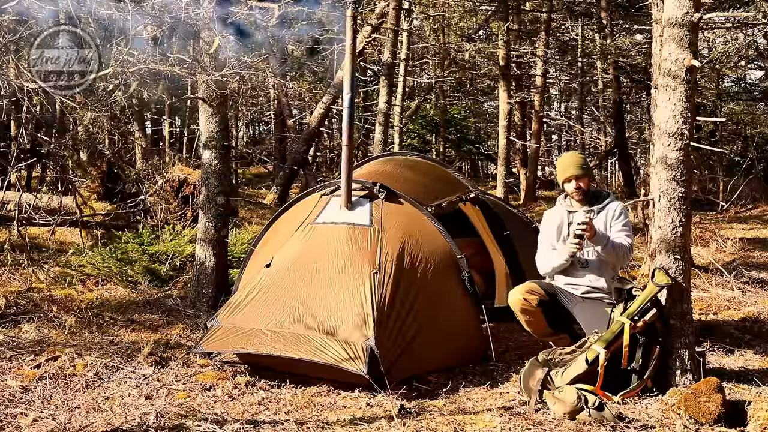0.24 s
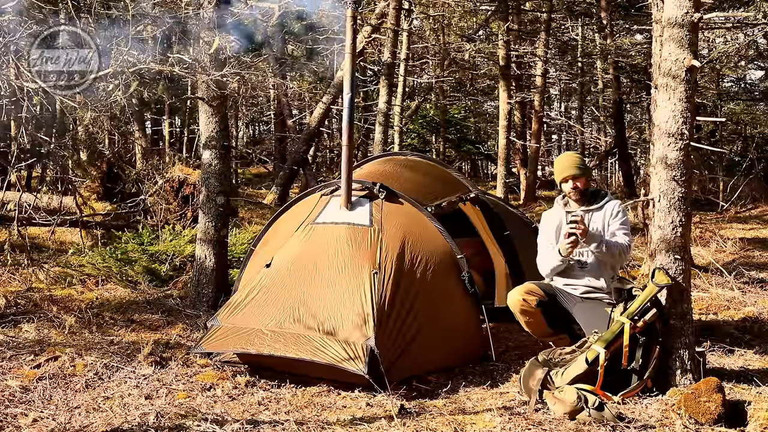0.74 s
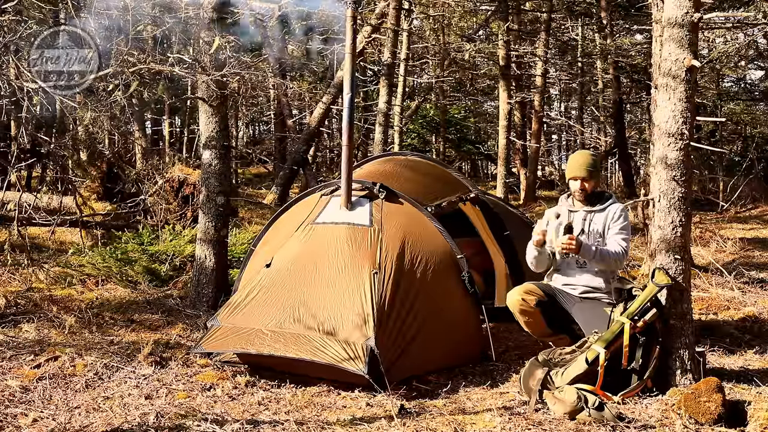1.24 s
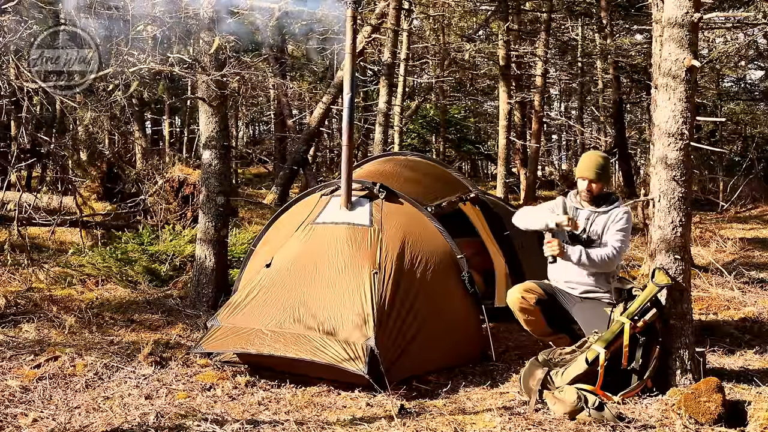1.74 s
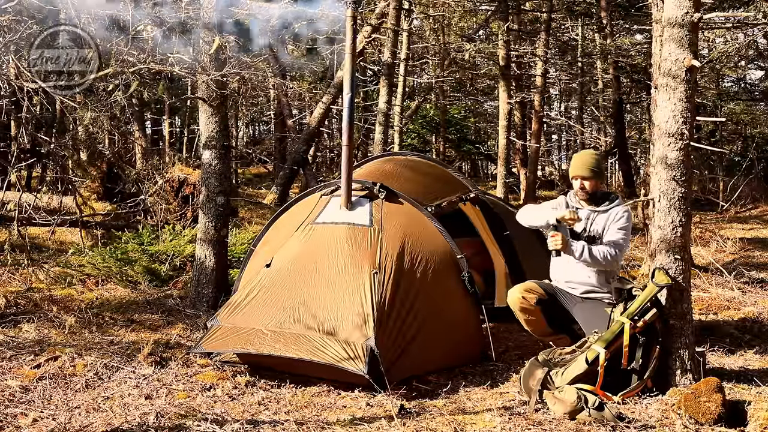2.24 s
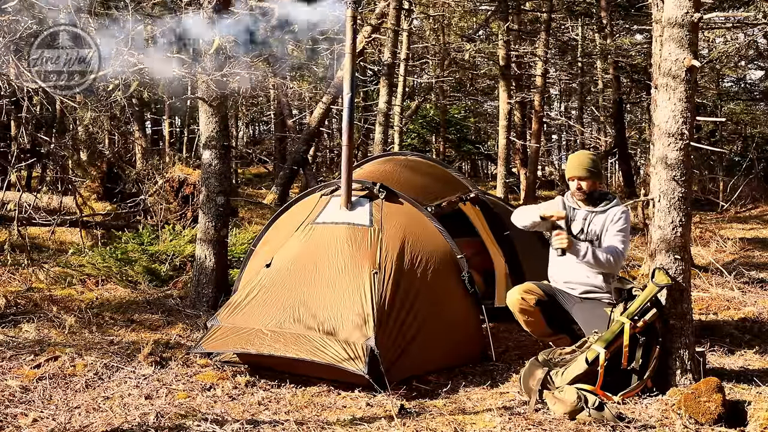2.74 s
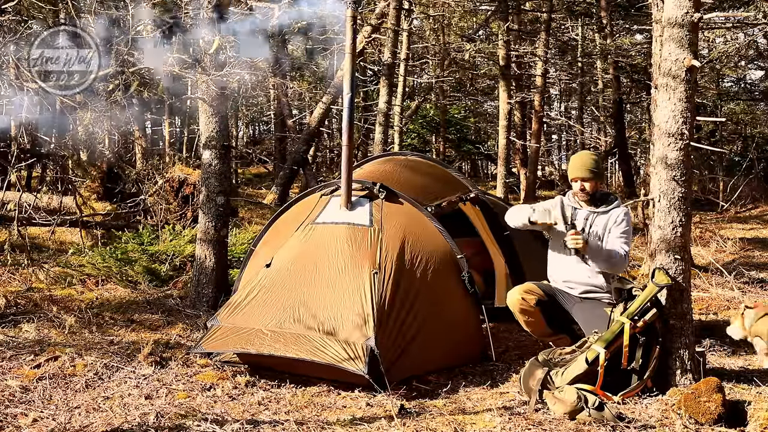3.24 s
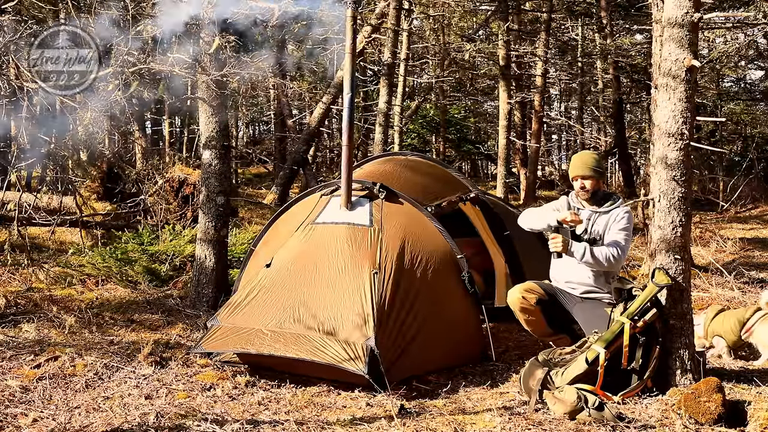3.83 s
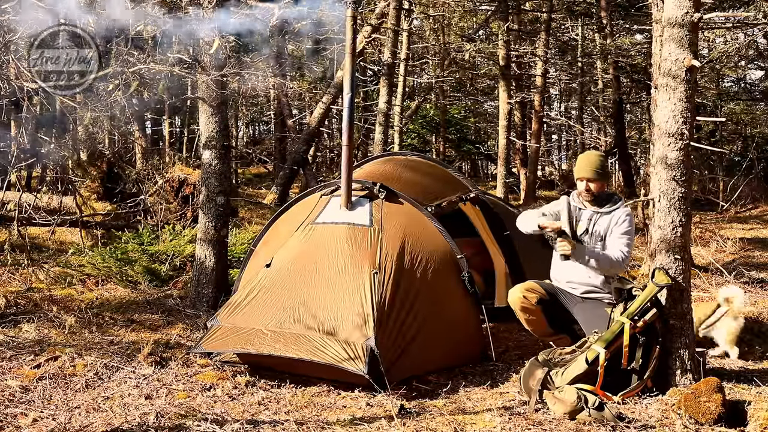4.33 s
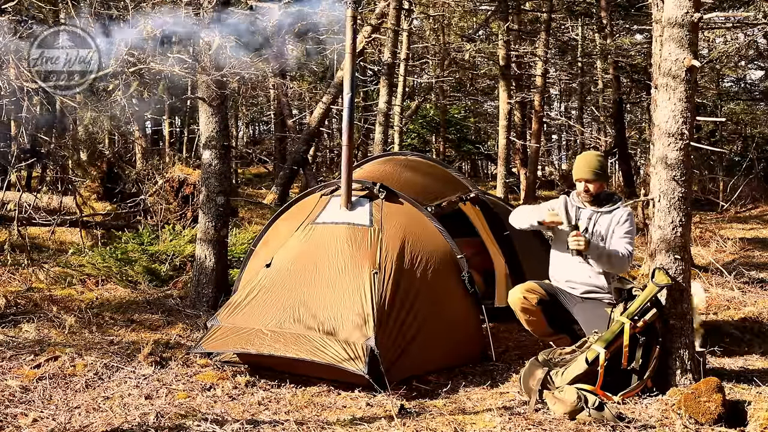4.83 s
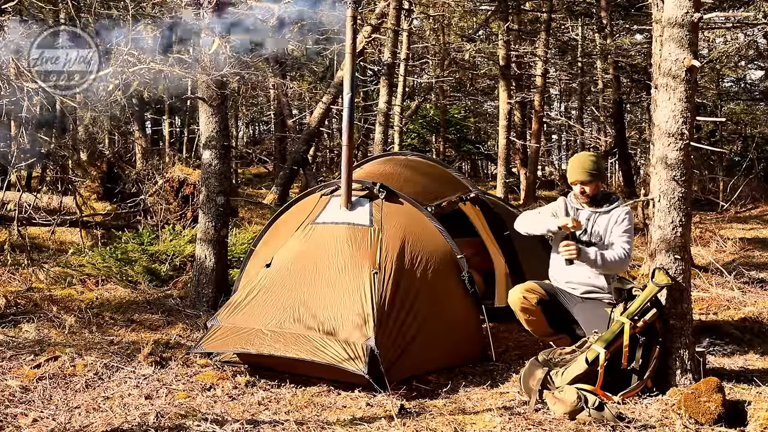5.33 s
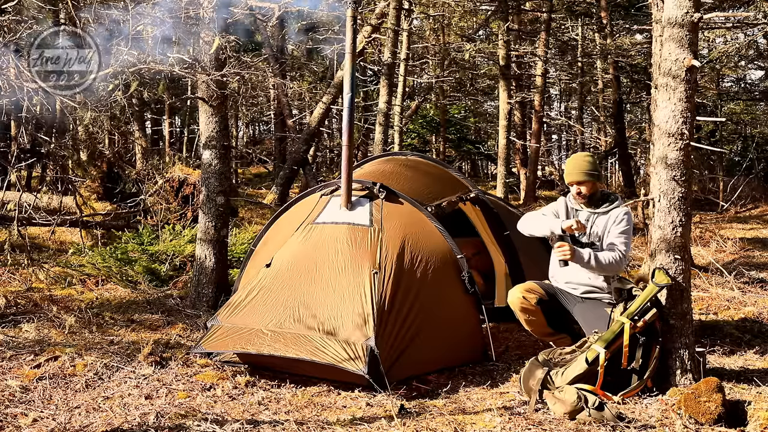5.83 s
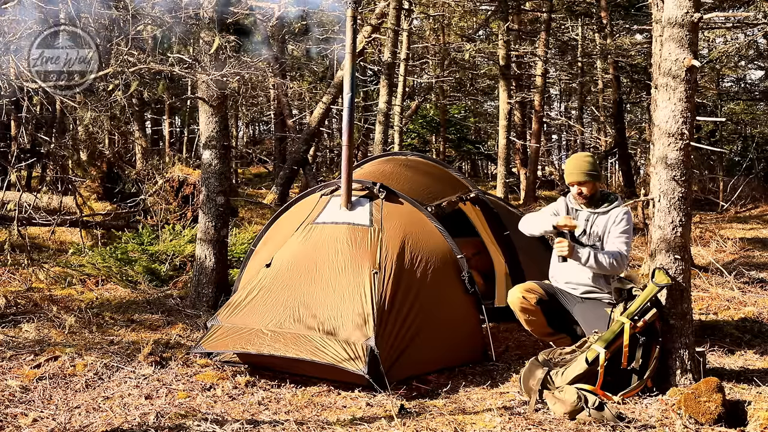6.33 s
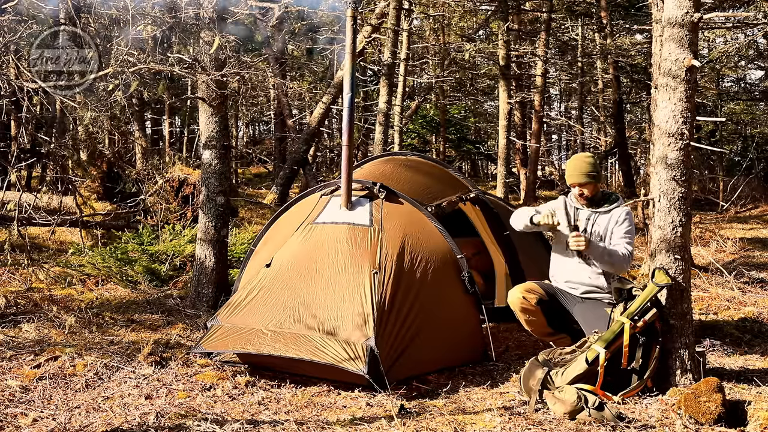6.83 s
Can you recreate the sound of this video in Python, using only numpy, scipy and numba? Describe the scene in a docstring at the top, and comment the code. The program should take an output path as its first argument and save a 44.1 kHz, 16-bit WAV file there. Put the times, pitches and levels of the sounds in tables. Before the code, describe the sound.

A quiet conifer forest, heard from a few metres away: steady soft hiss and roar of wind in needles, with low, wavering wind rumble on the microphone throughout. From 0.1 to 0.4 s fingers rustle a small coffee mill with tiny dry ticks. At 0.49 s the crank seats with a hard, bright snap and quick rebound, by far the loudest event. Lighter clicks follow at 0.59 and 0.73 s, fading to faint handling until 1.4 s. At 1.7 s grinding starts with a hesitant crunch, catching around 1.9 and 2.2 s, then settles into about two and a half turns per second, each with two swelling pushes. Beans crack and splinter with midrange, hollow rattling resonance and bright gritty specks. A clear jam at 5.7 s releases in sharp splits near 5.8 s; a hard tick lands at 6.0 s. Grinding continues to the end, about 7 s.

```python
"""Wind hisses and roars in conifers and rumbles on a microphone a few metres off: coloured noises with wandering levels.
Hands rustle and tick at a small coffee mill (clicks, ringing modes), then its crank snaps into place (blows on a lid).
Turning the crank crunches beans: random cracks and noisy splinters ring the body's modes and two sliding resonances,
under a load that swells at each push, stalls now and then and bites again. A short scattered tail surrounds the mill."""
import sys
import numpy as np
from scipy import signal
from scipy.fft import rfft, irfft, next_fast_len
from scipy.io import wavfile
from scipy.ndimage import uniform_filter1d
from numba import njit

SR = 44100
rng = np.random.default_rng(int(sys.argv[2]) if len(sys.argv) > 2 else 0)


def output_pcm(signal):
    """Save a mono or channel-first signal as 16-bit PCM at the path in sys.argv[1].

    Samples are clipped to [-1, 1] before scaling.
    """
    pcm = np.clip(np.atleast_2d(signal).T, -1, 1) * 32767
    wavfile.write(sys.argv[1], SR, np.round(pcm).astype(np.int16))


def convert_level_to_amplitude(level_db):
    """Map a level in decibels to its linear amplitude factor."""
    exponent = np.asarray(level_db, float) / 20
    return 10 ** exponent


N = 311346

# Turns of the crank, two pushes each. Each row: start in seconds, load at first push in relative dB,
# load at second push in relative dB, spectral tilt in dB per octave.
TURNS = [(1.55, -40.5, -42, 3.5), (2.0, -40.5, -42.5, 0), (2.3, -36.5, -40.5, 0.8),
         (2.685, -38.5, -40, -0.93), (3.083, -37.5, -40.5, -0.12), (3.496, -37, -41, 0),
         (3.863, -38, -42, -0.5), (4.258, -39.5, -39.5, 0.52), (4.664, -39, -38.5, -0.72),
         (5.033, -38, -39.5, -0.5), (5.423, -39, -38, 1), (5.889, -40.5, -37.5, -0.5),
         (6.253, -38, -36.5, -1), (6.673, -40.5, -38.5, -0.13), (7.03, -37, -39, -0.5),
         (7.42, -39, -39, 0.5)]


def on_time(table, column=1):
    """A column of a curve, whose first column is seconds, at every sample."""
    rows = np.array(table)
    return np.interp(np.arange(N) / SR, rows[:, 0], rows[:, column])


def unit(x):
    """Scale to rms 1."""
    return x / np.sqrt(np.mean(x ** 2))


def colour(x, points):
    """Shape a noise by a spectrum of (Hz, dB) points."""
    size = next_fast_len(len(x))
    hz, db = np.transpose(points)
    bin_hz = np.arange(size // 2 + 1) * SR / size
    gain = convert_level_to_amplitude(np.interp(np.log(bin_hz + 1), np.log(hz), db))
    return irfft(rfft(x, size) * gain, size)[:len(x)]


def walk(rate_hz):
    """Random levels 1 / rate_hz apart, joined by smoothed slopes; rms 1."""
    k = max(int(SR / rate_hz), 2)
    steps = np.interp(np.arange(N), np.arange(N // 64) * k, rng.standard_normal(N // 64))
    return unit(uniform_filter1d(steps, k))


@njit
def mode(x, hz, t60_s):
    """One decaying mode whose pitch may slide: a rotating complex state driven by x."""
    y, z = np.empty(len(x)), 0j
    for i in range(len(x)):
        z = z * np.exp(2j * np.pi * hz[i] / SR - np.log(1000) / (t60_s * SR)) + x[i]
        y[i] = z.imag
    return y


def ring(x, hz, t60_s):
    """A mode at a fixed or moving pitch, kept below 0.45 SR."""
    return mode(x + 1e-18, np.minimum(hz, 0.45 * SR) * np.ones(N), 1.0 * t60_s)


def blows(s, size):
    """An impulse train."""
    return np.bincount(np.clip((np.asarray(s) * SR).astype(int), 0, N - 1), size, N)


def crackle(rate_hz, spread_db, most_db):
    """Random clicks, many small and few large: times and signed sizes."""
    chance = rng.random((60000, 3))
    s = np.cumsum(-np.log(1 - chance[:, 0])) / rate_hz
    size_db = np.minimum(-spread_db * np.log(1 - chance[:, 1]), most_db)
    size = convert_level_to_amplitude(size_db) * np.sign(chance[:, 2] - 0.5)
    return s, size * (s < N / SR)


def peaks_db(s, db, rise_s, fall_s):
    """The highest of several peaks at every sample; rise_s and fall_s are per 10 dB."""
    t, out = np.arange(N) / SR, np.full(N, -200.0)
    for at, top, rise, fall in np.broadcast(s, db, rise_s, fall_s):
        out = np.maximum(out, top - 10 * np.maximum((at - t) / rise, (t - at) / fall))
    return out


def rumble():
    """Slow wind eddies press on the membrane: low noise whose level wanders."""
    # Each row: time in seconds, level in dB.
    rumble_level = [(0, -40.5), (1.2, -40), (1.9, -41.5), (2.7, -40.5), (3.1, -38), (3.6, -41.5),
                    (4.5, -40), (5.1, -41), (5.6, -43), (6.1, -39.5), (7.06, -39)]
    # Each row: frequency in Hz, relative density in dB per Hz.
    rumble_colour = [(15, -13.5), (22, 1), (33, 2), (60, -3), (90, -7.5), (130, -23.5), (250, -50.5)]
    level_db = on_time(rumble_level) + 0.5 * walk(11)
    return unit(colour(rng.standard_normal(N), rumble_colour)) * convert_level_to_amplitude(level_db)


def needles():
    """A distant smooth hiss that breathes with the gusts, over the deeper roar of the crowns."""
    # Each row: time in seconds, common level of hiss and roar in relative dB, extra level of the roar in relative dB.
    gust = [(0, -54, 3), (1.2, -54, 2), (2.5, -54, -3), (4, -53.5, -3.5), (5.4, -52.5, -6), (6, -54, -1),
            (7.06, -52.5, -3.5)]
    # Each row: frequency in Hz, relative density in dB per Hz.
    needle_colour = [(100, 2.5), (200, -6.5), (330, -1), (700, -0.5), (1050, -5.5), (1650, -8.5),
                     (2300, -16.5), (3500, -17), (5500, -28.5), (10000, -26.5), (16000, -32)]
    hiss = unit(colour(rng.standard_normal(N), needle_colour)) * convert_level_to_amplitude(7.5 + 0.53 * walk(6.5))
    roar_db = on_time(gust, column=2) - 2.5 + 1.5 * walk(3.95)
    roar = unit(ring(rng.standard_normal(N), 155.2, t60_s=0.0262)) * convert_level_to_amplitude(roar_db)
    return (hiss + roar) * convert_level_to_amplitude(on_time(gust))


def side_flicker():
    """Faint coloured noise, of opposite sign in left and right, whose level flickers."""
    # Each row: frequency in Hz, relative density in dB per Hz.
    side_colour = [(35, -46), (60, -19.5), (197, -4), (632, -14.5), (897, -31.5), (1890, -40),
                   (2690, -14.5), (3640, -42), (4380, -20.5), (6670, -15), (15800, -7.5)]
    return unit(colour(rng.standard_normal(N), side_colour)) * convert_level_to_amplitude(-73.5 + 1.82 * walk(20))


def handling():
    """Fingers and loose beans shift on the mill: a rustle of tiny clicks, with dry ringing ticks on top."""
    # Each row: loudest at in seconds, level in dB, rise in seconds per 10 dB, fall in seconds per 10 dB.
    rustles = [(.13, -56.5, 0.055, 1.34), (.215, -47.5, 0.0122, 0.08), (.232, -46, 0.021, 0.0354),
               (.34, -52, 0.053, 0.05), (.395, -58, .03, 0.1), (0.466, -46, 0.012, 0.03),
               (0.496, -43, 0.008, 0.045), (.72, -55, 0.105, 0.29), (.825, -50, 0.0154, 0.01),
               (.89, -51.5, 0.0104, 0.0153), (1.07, -59.5, .1, 0.03), (1.27, -57.5, 0.074, 0.09)]
    # Each row: frequency in Hz, relative density in dB per Hz.
    rustle_colour = [(1000, -25), (1700, -9), (2800, -4.5), (3700, 4.5), (5000, -1), (8000, -6),
                     (12000, -11.5), (16000, -28.5)]
    # Each row: time in seconds, blow level in dB, centre in Hz, treble edge in dB against the blow.
    ticks = [(.1236, -41.5, 3700, -3), (.148, -44, 3900, -10), (.2055, -38.5, 3720, 1),
             (0.3099, -41.5, 3500, -3.5), (0.3347, -39.5, 4340, 0.5), (.3925, -42.5, 5000, 2.5),
             (.588, -23, 3764, 2.5), (.6925, -45, 4800, 5), (.734, -30, 3880, -2.5),
             (0.7781, -37.5, 4280, -10), (0.8147, -40.5, 4050, 1), (0.8889, -40.5, 3700, -4),
             (0.9787, -46, 4700, 8.5), (1.4324, -42, 3180, -0.5), (2.4387, -41, 5200, 7),
             (4.816, -36.5, 3800, -12), (5.2186, -37.5, 4200, -2.5), (5.551, -45, 4500, 5.5),
             (5.9973, -32, 3800, -7.5), (6, -25.5, 4190, -13.5), (6.002, -33.5, 3500, -14)]
    rest_db, end_s = -65, 1.68
    s, size = crackle(6000.0, spread_db=5.0, most_db=-0.5)
    level_db = np.maximum(peaks_db(*np.transpose(rustles)), rest_db) + 2.76 * walk(89.98)
    out = unit(colour(blows(s, size), rustle_colour)) * convert_level_to_amplitude(level_db) * (np.arange(N) < end_s * SR)
    for at, db, hz, edge_db in ticks:
        hit = np.convolve(blows([at], [convert_level_to_amplitude(db)]), [0.08, 0.84, 0.08], "same")
        out = out + ring(hit, hz, 0.00366)
        out = out - convert_level_to_amplitude(-2.0) * ring(hit, 1.354 * hz, 0.004)
        out = out + convert_level_to_amplitude(edge_db) * ring(hit, 7930.0, 0.0019)
        out = out + convert_level_to_amplitude(-10.5) * ring(hit, hz / 2, 0.0038)
    return out


def trunks(x):
    """A short scattered tail from tent, ground and trunks: decaying noise after a 4 ms gap."""
    t = np.arange(SR // 4) / SR
    t60_s = 0.224
    tail = rng.standard_normal(len(t)) * np.exp(-np.log(1000) * t / t60_s) * (t > 0.004)
    return signal.fftconvolve(x, tail / np.sqrt(np.sum(tail ** 2)))[:N]


def snap():
    """The crank seats on the shaft and rebounds: quick blows ring lid and crank, which give no bass."""
    # Each row: time in seconds, blow level in dB, direction as a sign, contact in ms.
    seating = [(0.4886, -8, 1, .08), (0.4896, -22, 1, .06), (0.4907, -14, -1, .02), (0.4915, -17, -1, .02),
               (.4924, -22, 1, .04)]
    # Modes of lid and crank. Each row: frequency in Hz, level in relative dB, t60 in seconds.
    lid_modes = [(598, -13.5, 0.0133), (1089, -8.5, 0.02), (1138, -27, 0.12), (1203, -30, .12),
                 (1470, -11.5, 0.01), (1700, -30.5, 0.005), (2310, -18, 0.0076), (2620, -5, 0.0092),
                 (3180, -4.5, 0.00684), (3700, -11, .008), (4900, -9, 0.0058), (5950, -14.5, 0.0035),
                 (7100, -16, 0.0024), (8800, -16, 0.0024), (12100, -31, .0015)]
    ms = np.arange(-30, 31) / SR * 1000
    hit = 0
    for at, db, direction, contact_ms in seating:
        push = np.exp(-0.5 * (ms / max(contact_ms / 3, 0.003)) ** 2)
        hit = hit + np.convolve(blows([at], [convert_level_to_amplitude(db) * np.sign(direction)]), push / push.sum(), "same")
    lid = 0
    for hz, db, t60_s in lid_modes:
        phase = (-1) ** (hz > 2000)  # high modes start opposite to low ones
        lid = lid + phase * convert_level_to_amplitude(db) * ring(hit, hz, t60_s)
    return signal.sosfilt(signal.butter(3, 550.0, "high", fs=SR, output="sos"), lid)


def crank():
    """Angle of the crank in turns, and the load in relative dB that swells at each push."""
    push_at, slack_db = np.array([0.323, 0.944]), -1.3142  # place in the turn (0-1); load dip between pushes
    start, first_db, second_db, _ = np.transpose(TURNS)
    angle = np.interp(np.arange(N) / SR, start, np.arange(len(start)))
    pushes = (np.arange(len(start))[:, None] + push_at).ravel()
    strength_db = np.interp(angle, pushes, np.column_stack([first_db, second_db]).ravel())
    between = np.interp(angle, pushes, np.arange(len(pushes)))
    return angle, strength_db + slack_db * np.sin(np.pi * between) ** 2


def bite():
    """Gain of the burrs: fading into each jam, then biting again when the crank breaks free."""
    # Each row: restart in seconds, length of the jam in seconds, depth in dB, surge after it in dB, recovery in seconds.
    stalls = [(1.7072, .02, -11, 5, 0.00098), (1.9, 0.0466, -5.5, 5.5, 0.0245),
              (2.207, 0.05, -13, 3.5, 0.005), (2.345, 0.024, -10, 2, 0.002), (2.676, 0.0143, -3.5, 2, .001),
              (2.775, 0.031, -2, 0, 0.0127), (2.892, 0.0235, -4.5, 2.5, .001),
              (3.79, 0.0376, -4, -0.5, 0.021), (4.204, 0.027, -12, 6.5, .001),
              (4.35, 0.0344, -4.5, 2.5, 0.081), (5.425, 0.0164, -5.5, 0, 0.0051),
              (5.545, 0.032, -3, 1, 0.0091), (5.765, 0.0586, -14, 1.5, 0.00102),
              (6.558, 0.019, -8, -0.5, 0.053), (6.98, 0.024, -5.5, 0.5, 0.041)]
    crank_start_s, jam_fade_s, surge_fade_s = 1.7015, 0.008, 0.083
    t, db = np.arange(N) / SR, np.zeros(N)
    ragged = 1 + 0.136 * walk(120)  # a jam never holds quite still
    for restart, length, depth_db, surge_db, recovery in stalls:
        free = np.clip((t - restart) / max(recovery, 1 / SR), 0, 1)
        jam = np.clip((t - restart + length) / jam_fade_s, 0, 1) * (1 - free)
        db = db + depth_db * jam * ragged
        db = db + surge_db * np.exp(-np.abs(t - restart) / surge_fade_s) * free
    return convert_level_to_amplitude(db) * (t >= crank_start_s)


def chips():
    """Gain that jumps as each small chip breaks off and dies away within milliseconds; rms 1."""
    fade_s, share = 0.0022, 0.6
    s, size = crackle(260, spread_db=1.5, most_db=4.5)
    jumps = signal.lfilter([1], [1, -np.exp(-1 / (fade_s * SR))], blows(s, np.abs(size)))
    return unit(1 + share * jumps)


def flaring(rows, rest_hz, rest_db, load_db):
    """Pitch and level (dB against the load) of a resonance that leaves its rest at each flare."""
    rise_s, fall_s, glide_hz_per_s = 0.028, 0.03, -2000  # rise and fall per 10 dB
    s, db, hz = np.transpose(rows)
    t = np.arange(N) / SR
    nearest = np.searchsorted((s[1:] + s[:-1]) / 2, t)
    flare_db = peaks_db(s, db, rise_s, fall_s) - load_db
    flare_hz = hz[nearest] + glide_hz_per_s * (t - s[nearest])
    return np.where(flare_db > rest_db, flare_hz, rest_hz), np.maximum(flare_db, rest_db)


def sliding(angle, load_db):
    """Two flaring resonances, the lower moving as the crank goes round: (Hz, dB against the load, t60 s)."""
    # Each row: time in seconds, level in relative dB, pitch at that time in Hz.
    flares = [(1.774, -43.5, 2310), (2.04, -42, 2410), (2.14, -42, 3244), (2.229, -41.5, 2288),
              (2.306, -40.5, 2350), (2.417, -40, 2160), (2.442, -40.5, 2050), (2.478, -41, 2480),
              (2.608, -41, 2976), (2.63, -38.5, 3410), (2.681, -41.5, 3500), (2.70, -42, 2360),
              (2.794, -37.5, 2104), (2.858, -40.5, 1956), (2.923, -41, 3248), (3.03, -39.5, 2996),
              (3.116, -40.5, 2350), (3.196, -37.5, 2173), (3.2, -36.5, 3180), (3.244, -40.5, 2000),
              (3.283, -40, 1980), (3.43, -40, 3094), (3.565, -40.5, 2050), (3.806, -36, 2896),
              (3.83, -39, 3470), (3.85, -40.5, 3477), (3.892, -39, 2386), (3.938, -37.5, 2050),
              (3.964, -36, 2074), (4.03, -40, 3133), (4.109, -44.5, 2220), (4.229, -41.5, 1950),
              (4.257, -41, 2437), (4.273, -43, 3070), (4.428, -39, 2080), (4.454, -38, 2802),
              (4.585, -37.5, 3096), (4.666, -39, 2340), (4.761, -37, 3207), (4.91, -47, 3500),
              (4.978, -37, 2970), (5.01, -43, 3440), (5.045, -40, 2380), (5.14, -45.5, 2130),
              (5.299, -42.5, 3665), (5.346, -40, 3180), (5.399, -41.5, 2340), (5.441, -39, 3522),
              (5.621, -40, 3200), (5.675, -40.5, 3543), (6.003, -39.5, 3260), (6.122, -41, 3100),
              (6.212, -38.5, 3180), (6.283, -38.5, 3095), (6.287, -38.5, 2340), (6.322, -39, 2050),
              (6.366, -38.5, 2200), (6.506, -38, 2900), (6.535, -42, 3060), (6.623, -42, 3257),
              (6.685, -36, 2300), (6.87, -43, 2990), (6.922, -40.5, 3060), (7.02, -43, 3324)]
    rows = np.array(flares)
    split_hz, t60_s = 2750, 0.009
    # lowest at 0.431 of a turn, most muffled at 0.654
    lower_hz = 2200 - 128 * np.cos(2 * np.pi * (angle - 0.431))
    lower_db = -8.5 - 2 * np.cos(2 * np.pi * (angle - 0.654))
    lower_hz, lower_db = flaring(rows[rows[:, 2] < split_hz], lower_hz, lower_db, load_db)
    upper_hz = 3220 * (1 + 0.0402 * walk(12))
    upper_db = -12 + 2.0 * walk(20)
    upper_hz, upper_db = flaring(rows[rows[:, 2] >= split_hz], upper_hz, upper_db, load_db)
    return [(lower_hz, 4.5 + lower_db, t60_s), (upper_hz, 5 + upper_db, t60_s)]


def bursts(s, size, fade_s):
    """Each event as a splinter of noise that starts at once and fades."""
    t = np.arange(SR // 40) / SR
    out = np.zeros(N + len(t))
    for at, height, noise in zip(s, size, rng.standard_normal((len(s), len(t)))):
        first = int(at * SR)
        out[first:first + len(t)] += height * noise * np.exp(-t / fade_s)
    return out[:N]


def grit(gain):
    """Sparse bright specks of shell flying off the burrs, now higher, now lower."""
    # Each row: time in seconds, level in dB ahead of the grinding gain.
    grit_level = [(1.71, -59), (1.87, -72), (1.92, -65), (2.14, -63), (2.17, -72), (2.23, -62), (2.29, -72),
                  (2.44, -57), (2.5, -66), (3.35, -64), (3.47, -69), (3.69, -60), (3.75, -71), (4.09, -62),
                  (4.18, -75), (4.21, -63), (4.33, -66), (5.51, -65), (5.67, -60), (5.73, -71), (5.78, -65),
                  (6.78, -65), (6.79, -69), (7.06, -62)]
    s, size = crackle(700.0, spread_db=7.0, most_db=9.5)
    specks = unit(ring(blows(s, size), 10950.0 * (1 + 0.07 * walk(20)), t60_s=0.0011))
    return specks * gain * convert_level_to_amplitude(on_time(grit_level) + 1.5 * walk(40))


def mill():
    """Cracks and splits ring the body; each crack reaches every mode by its own share."""
    # Modes of the body. Each row: frequency in Hz, level in relative dB, t60 in seconds.
    body = [(612, -21, 0.02), (877, -1, 0.0167), (1153.7, 0, 0.01524), (1423, -4, 0.0107),
            (1857, -4.5, 0.0067), (2599, -3.5, 0.0056), (3700, -8, 0.0136), (4319, -12.5, 0.00704),
            (5000, -13, 0.0047), (5340, -26.5, 0.012), (7030, -32.5, 0.0061), (9750, -21, 0.0022),
            (11420, -24, 0.0017), (13100, -31.5, .0012)]
    # Beans heard to split. Each row: time in seconds, level in relative dB, centre in Hz.
    splits = [(1.7075, -24, 4200), (1.713, -24, 3700), (1.725, -28, 4600), (1.7365, -23, 4200),
              (1.753, -25, 4200), (1.771, -32, 2300), (1.834, -32, 2400), (1.9403, -19, 2140),
              (1.973, -26.5, 2100), (2.0229, -26, 2800), (2.2121, -28, 2260), (2.261, -29, 2300),
              (2.305, -29, 2300), (2.368, -29, 3200), (2.4187, -26, 4200), (2.4496, -24, 5000),
              (2.47, -26, 4800), (2.6776, -24, 3000), (2.7918, -26, 2100), (2.8546, -25, 3150),
              (2.893, -23, 1800), (2.9215, -29, 3230), (2.997, -26.5, 3600), (3.185, -30, 4200),
              (3.28, -29, 2030), (3.436, -29, 3500), (3.8024, -30, 2950), (4.026, -28.5, 3130),
              (4.11, -28.5, 2800), (4.206, -24, 2600), (4.226, -25, 2100), (4.251, -28, 2200),
              (4.258, -27, 2400), (4.273, -28, 3100), (4.304, -29, 2400), (4.426, -28, 1200),
              (4.971, -27.5, 3000), (5.051, -26, 2300), (5.394, -25.5, 2330), (5.4298, -25.5, 3510),
              (5.632, -25.5, 1200), (5.7669, -25.5, 2620), (5.784, -28, 1800), (5.8, -30, 2500),
              (5.822, -19, 2800), (5.8517, -25, 3600), (5.863, -27, 3500), (5.889, -27, 2400),
              (5.909, -28, 2500), (5.947, -29, 2500), (5.997, -21, 3300), (6.007, -26, 3500),
              (6.3736, -27.5, 2330), (6.4276, -37.5, 2130), (6.5031, -27, 2950), (6.534, -25.5, 2900),
              (6.62, -29, 3220), (6.668, -27, 1800), (6.731, -29, 1100)]
    split_most_db = -3  # the most that any mode lends to a split
    s, size = crackle(2500, spread_db=0.5, most_db=5.5)
    angle, load_db = crank()
    grind = chips() * bite()
    force = convert_level_to_amplitude(load_db) * grind
    tilt = on_time(TURNS, column=3) + 0.3 * walk(60)
    split_s, split_db, split_hz = np.transpose(splits)
    crunch, hits = 0, 0
    for hz, db, t60_s in body + sliding(angle, load_db):
        centre = np.mean(hz)
        # the grip of the turning hand shifts and damps now one mode, now another; fixed modes more
        hz = hz * (1 + (0.04 if np.isscalar(hz) else 0.015) * walk(9))
        grip_db = (1.7 if np.isscalar(db) else 0.8) * walk(45) + tilt * np.log2(centre / 1990.0)
        cracks = blows(s, size * rng.standard_normal(len(s)))
        ringing = ring(cracks * convert_level_to_amplitude(db + grip_db) * force, hz, t60_s)
        crunch = crunch + ringing / np.sqrt(np.mean(cracks ** 2) * t60_s * SR)
        # a split rings most the modes near its own pitch
        near = convert_level_to_amplitude(split_db - 20 - 7.65 * np.abs(np.log2(centre / split_hz)))
        splinters = bursts(split_s, near, fade_s=0.0028)
        hits = hits + ring(convert_level_to_amplitude(np.minimum(db, split_most_db)) * splinters, hz, t60_s)
    return convert_level_to_amplitude(6.0) * crunch + hits + grit(grind)


def scene():
    """All sources in the middle; only a faint flicker tells left from right."""
    near = mill() + snap() + handling()
    mono = near + convert_level_to_amplitude(-16.5) * trunks(near) + needles() + rumble()
    side = side_flicker()
    return np.array([mono + side, mono - side])


def roll_off(x):
    """The treble ends steeply here."""
    return signal.sosfilt(signal.butter(12, 16830, fs=SR, output="sos"), x)


def record(dry):
    """A steep low-pass cuts off the top at 15.8 kHz."""
    low_pass = signal.ellip(10, 0.2, 70, 15800, fs=SR, output="sos")
    mix = signal.sosfilt(low_pass, dry)
    return roll_off(mix)


dry = scene()
out = record(dry)
output_pcm(out)
```